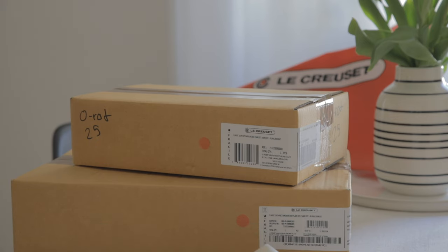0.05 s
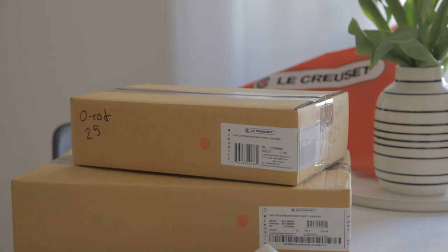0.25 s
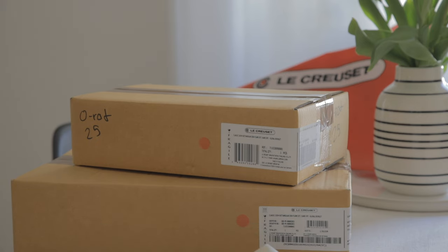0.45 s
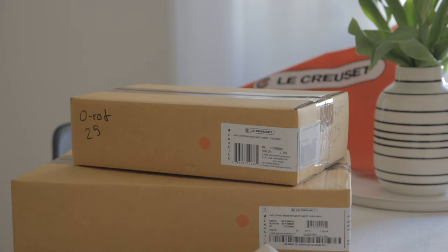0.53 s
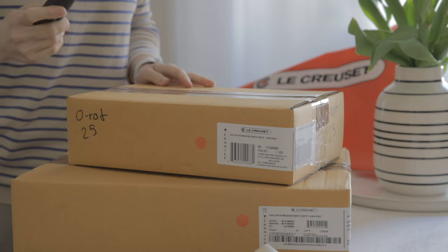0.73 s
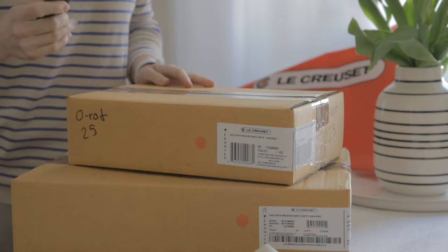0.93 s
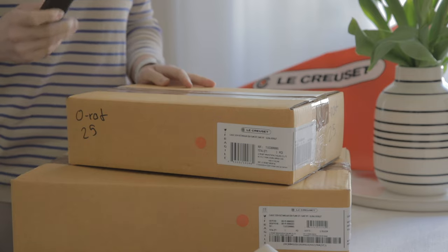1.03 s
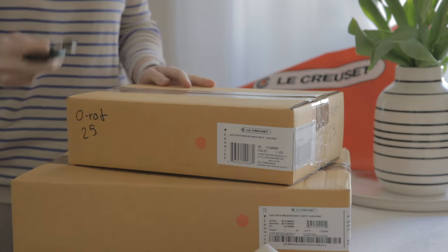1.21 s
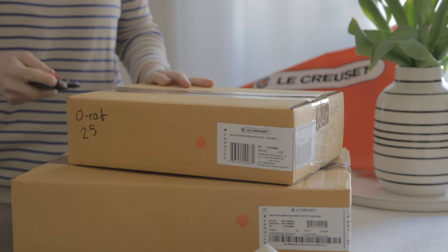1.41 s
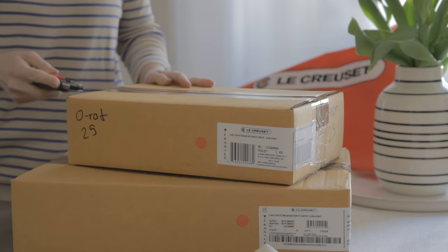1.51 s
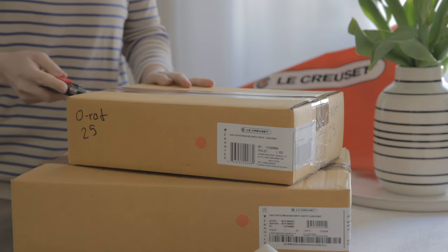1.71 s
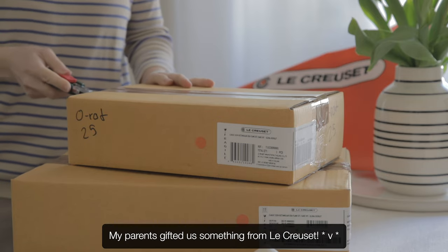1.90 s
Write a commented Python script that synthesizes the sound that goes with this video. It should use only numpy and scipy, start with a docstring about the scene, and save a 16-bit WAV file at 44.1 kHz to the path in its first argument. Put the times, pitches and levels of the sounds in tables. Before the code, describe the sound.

A utility knife blade slides out with six quick, sharp clicks, just after a few dull footsteps. Sleeves then rustle faintly and a hand brushes a cardboard box, in a slightly echoing room with a low rumble.

```python
"""A shoe rubs faintly and someone steps up to a table with dull thumps (0.2-0.6 s). The blade of a
utility knife is pushed out: six sharp ratchet clicks (0.6-0.9 s), on the whole louder and ringing
lower as more blade stands free. Sleeves rustle (1.3 s), then a hand brushes a cardboard box (1.7 s).
The room is fairly live, with a low steady rumble throughout."""
import sys
import numpy as np
from scipy import signal
from scipy.fft import rfft, irfft, next_fast_len
from scipy.io import wavfile
from scipy.ndimage import map_coordinates

SR = 44100
rng = np.random.default_rng(int(sys.argv[2]) if len(sys.argv) > 2 else 0)


def generate_wav(sig):
    """Save sig (samples, or channels by samples) to the path in sys.argv[1] as 16-bit PCM at SR."""
    pcm = np.round(np.clip(np.atleast_2d(sig).T, -1, 1) * 32767).astype(np.int16)
    wavfile.write(sys.argv[1], SR, pcm)


N = 85995

# diffuse field, left against right: freq_hz, correlation
ROOM_CORRELATION = [(100, 0.96), (300, 0.95), (700, 0.58), (1300, 0.51), (2500, 0.055), (6000, -0.042),
                    (14000, -0.12)]


def knife():
    """At each notch the slider rattles, the case buzzes, blade and track ring, the room echoes."""
    # notches: start_s, snap_db, blade_db, track_db, room_db, blade_pitch_ratio, tilt_db_per_octave,
    # track_resonance_db
    clicks = [(0.5841, -30, -58, -67, -25.5, 1.2, 0, -3.5),
              (0.6544, -28.5, -48, -58, -25.5, 1.14, -1, -0.5),
              (.7172, -28.5, -46.5, -46, -24, 1.13, -1.5, -3),
              (.7640, -26, -46, -40.5, -21, 0.95, -0.5, 7.5),
              (0.8355, -24, -47, -39.5, -18.5, 1.02, -.5, 5), (0.9192, -20, -40.5, -43, -16.5, 1.0, 1, 5.5)]
    # case response: freq_hz, gain_db
    case_spectrum = [(300, -26), (900, -20.5), (1450, -13), (1900, -6), (2350, -9), (2720, -1), (3250, -7),
                     (4400, -2), (5000, -1.5), (6300, -1), (7300, 1), (8700, -5), (10500, -3), (11400, -2),
                     (13000, -4.5), (15500, -3)]
    # blade, fully out: freq_hz, level_db, t60_s
    blade_modes = [(1864, -2, .38), (1931, -3, .34), (2026, -6, .25), (2640, -8, .15), (2830, -10, .15)]
    # steel track: freq_hz, level_db, t60_s
    track_modes = [(4440, -7, .3), (5404, -4, .3), (5545, -2, .3), (5675, -4, .3), (5853, -6, .25),
                   (6192, -7, .25), (6558, -7, .2), (7283, -8, .2)]
    # early echoes: delay_s, gain_db
    echoes = [(.0056, -1.5), (0.0118, -6.5)]
    rattle_s, buzz_db, buzz_t60_s = 0.0024, -13.5, 0.054
    blade_peak_hz, blade_width_hz, blade_peak_db = 1930, 170, 7.5  # blade in its holder
    track_peak_hz, track_width_hz = 5680, 340
    scatter_db, scatter_step_hz = 1.8, 330  # no two notches alike
    out, t = np.zeros((2, N)), np.arange(SR) / SR
    hz = freqs(t)
    contact = np.exp(-(t / rattle_s) ** 2) + amp(buzz_db - 60 * t / buzz_t60_s)
    impulse = np.linalg.norm(contact) * (t == 0)
    for start_s, snap_db, blade_db, track_db, room_db, pitch_ratio, tilt, resonance_db in clicks:
        colour_db = along(case_spectrum, hz) + tilt * np.log2((hz + 500) / 6000)
        colour_db += blade_peak_db * np.exp(-((hz - blade_peak_hz * pitch_ratio) / blade_width_hz) ** 2)
        colour_db += resonance_db * np.exp(-((hz - track_peak_hz) / track_width_hz) ** 2)
        colour_db += scatter_db * smooth_noise(hz / scatter_step_hz, knots=128)
        snaps = [coloured(burst(contact), colour_db) for _ in range(2)]
        steel = [amp(blade_db) * ring(blade_modes, t, pitch_ratio) + amp(track_db) * ring(track_modes, t)
                 for _ in range(2)]
        add(out, start_s, amp(snap_db) * spread(*snaps, side_db=-5.5) + spread(*steel, side_db=-2))
        add(out, start_s, amp(room_db) * reverb(coloured(impulse, colour_db)))
        for delay_s, gain_db in echoes:
            echo = np.array([coloured(burst(contact), colour_db) for _ in range(2)])
            add(out, start_s + delay_s, amp(snap_db + gain_db) * echo)
    return out


def steps():
    """Footfalls: a soft push and a woody knock set floor and room ringing."""
    # footfalls and after-knocks: start_s, thud_db, knock_db, mode_db
    thumps = [(.2020, -29.5, -48, -39), (.2180, -30.5, -54, -46), (.2570, -41, -54, -80),
              (0.288, -36.5, -64, -55), (.3190, -28, -22.5, -38), (0.3299, -33, -24, -37),
              (.3470, -29, -27.5, -40.5), (.3665, -35.5, -37, -41.5), (.4545, -35, -32, -42),
              (0.464, -35.5, -31.5, -51), (.4800, -36, -37, -39), (.5000, -41.5, -33.5, -47),
              (.5460, -45.5, -39.5, -46), (.5770, -50, -49, -48)]
    # soft push: freq_hz, gain_db
    thud_spectrum = [(30, -46), (60, -20), (130, -2.5), (200, -5), (320, -4), (460, -7.5), (800, -19.5),
                     (1500, -30), (4000, -50), (16000, -73)]
    # woody knock: freq_hz, gain_db
    knock_spectrum = [(60, -30), (250, -10.5), (540, -5), (700, 2), (1100, -0.5), (1270, -5), (1450, -16),
                      (2200, -21), (3200, -46), (6000, -45), (16000, -53)]
    # room resonances: freq_hz, level_db, t60_s
    room_modes = [(181, -7, .6), (319, -6, .6), (393, -10, .5), (468, -10, .5), (639, -7, .45),
                  (692, -7, .5), (906, -9, .5), (1023, -7, .45), (1083, -10, .45)]
    # floor booms: start_s, pitch_hz, level_db, t60_s
    booms = [(0.2, 133.5, -22, 0.12), (0.327, 94.8, -32.5, 0.46), (.452, 95.96, -34, 0.47),
             (.577, 94, -43, 0.5)]
    swell_s, contact_rise_s, knock_t60_s = 0.021, 0.0012, 0.04
    thud_room_db, knock_room_db = 2, -1.5
    out, t = np.zeros((2, N)), np.arange(SR) / SR
    swell = 1 - np.exp(-t / swell_s)
    contact = (1 - np.exp(-t / contact_rise_s)) * amp(-60 * t / knock_t60_s)
    impulse = np.linalg.norm(contact) * (t == 0)
    wood_db = along(knock_spectrum, freqs(t))
    push = coloured(impulse, along(thud_spectrum, freqs(t)))
    rap = coloured(impulse, wood_db)
    for start_s, thud_db, knock_db, mode_db in thumps:
        thud = amp(thud_db) * (push + amp(thud_room_db) * reverb(push))
        knock = amp(knock_db) * (coloured(burst(contact), wood_db) + amp(knock_room_db) * reverb(rap))
        add(out, start_s, thud + knock + amp(mode_db) * ring(room_modes, t) * swell)
    for start_s, pitch_hz, level_db, t60_s in booms:
        add(out, start_s, amp(level_db - 60 * t / t60_s) * swell * np.sin(2 * np.pi * pitch_hz * t))
    return out


def brushes():
    """Shoe or hand rubs lightly: a faint hollow squeak over a dry scuff."""
    # rubs: start_s, rise_s, t60_s, squeak_hz, width_hz, squeak_db, scuff_db
    rubs = [(0, 0.012, 1, 388, 39.2, -58.5, -65.5), (.090, 0.0042, 0.3, 1166, 72, -51.5, -82),
            (.105, 0.012, 0.1, 787, 30, -53, -80), (0.144, 0.0069, 0.098, 1124, 75.6, -57.5, -80),
            (1.735, 0.0063, 0.23, 920, 220, -56.5, -58), (1.762, 0.0077, 0.65, 950, 110, -60, -60),
            (1.859, 0.0089, 0.53, 1000, 203, -65, -62.5)]
    # dry friction: freq_hz, gain_db
    scuff_spectrum = [(150, -12), (700, -5.5), (1500, -5.5), (3200, -9.5), (4500, -17.5), (15000, -31)]
    out, t = np.zeros((2, N)), np.arange(N) / SR
    for start_s, rise_s, t60_s, squeak_hz, width_hz, squeak_db, scuff_db in rubs:
        resonance = 1 / (1 + (2 * (freqs(t) - squeak_hz) / width_hz) ** 2)
        squeak = unit(irfft(rfft(stereo_noise(ROOM_CORRELATION, N)) * resonance, N))
        scuff = hiss(scuff_spectrum, ROOM_CORRELATION)
        envelope = np.minimum(t / rise_s, 1) * amp(-60 * np.maximum(t - rise_s, 0) / t60_s)
        add(out, start_s, envelope * (amp(squeak_db) * squeak + amp(scuff_db) * scuff))
    return out


def sleeves():
    """Cloth rustles as body and arm move."""
    # rustle envelope: time_s, level_db
    rustle = [(0, -65), (.19, -67), (.23, -54.5), (.3, -64.5), (.35, -53), (.4, -56), (.45, -61.5),
              (.56, -63), (1.241, -64), (1.34, -57), (1.42, -61), (1.54, -66), (1.95, -65.5)]
    # cloth friction: freq_hz, gain_db
    cloth_spectrum = [(150, -15), (600, 2), (950, -1), (1350, 1), (2000, -2.5), (2600, -2.5), (3200, -2),
                      (3900, -7.5), (5000, -6.5), (9000, -13), (15000, -14.5)]
    level_db = np.interp(np.arange(N) / SR, *np.transpose(rustle))
    return amp(level_db) * hiss(cloth_spectrum, ROOM_CORRELATION)


def reverb(x):
    """Diffuse stereo room tail of about unit energy; treble dies first."""
    # room decay: freq_hz, t60_s
    decay_times = [(100, 1), (400, 0.5), (1000, 0.47), (2000, 0.82), (5000, .52), (8000, 0.44),
                   (15000, 0.28)]
    rise_s = 0.0013
    hz, t, noise = signal.stft(stereo_noise(ROOM_CORRELATION, SR), SR, nperseg=256)
    t60_s = along(decay_times, hz)[:, None]
    envelope = amp(-60 * t / t60_s) * (1 - np.exp(-t / rise_s))
    tail = signal.istft(noise * envelope, SR, nperseg=256)[1]
    return signal.fftconvolve(x[None], tail / np.linalg.norm(tail[0]), axes=1)[:, :SR]


def room_tone():
    """Low rumble with a little hiss, wavering slightly."""
    # rumble and hiss: freq_hz, gain_db
    air_spectrum = [(30, -38), (50, -7.5), (90, -15.5), (140, 0), (205, 0.5), (300, -8), (400, -5),
                    (500, -13), (900, -12), (1300, -18.5), (1900, -21.5), (4000, -29.5), (7000, -33.5),
                    (15500, -40.5)]
    # room tone, left against right: freq_hz, correlation
    air_correlation = [(60, 0.78), (180, 0.95), (550, 0.76), (1650, 0.46), (4970, -0.68), (15000, -0.057)]
    level_db, waver_db, knots_per_s = -60.5, 0.5, 10
    waver = smooth_noise(np.arange(N) * knots_per_s / SR, knots=24)
    return amp(level_db + waver_db * waver) * hiss(air_spectrum, air_correlation)


def amp(db):
    return 10 ** (np.asarray(db) / 20)


def unit(x):
    return x / np.sqrt(np.mean(x ** 2) + 1e-20)


def along(points, hz):
    """Interpolate (freq_hz, value) points on a log axis."""
    knots_hz, values = np.transpose(points)
    return np.interp(np.log(hz + 1), np.log(knots_hz + 1), values)


def freqs(x):
    return np.fft.rfftfreq(x.shape[-1], 1 / SR)


def add(out, start_s, x):
    i = max(0, round(start_s * SR))
    out[:, i:i + x.shape[-1]] += x[..., :N - i]


def spread(mid, side, side_db):
    return mid + amp(side_db) * np.array([side, -side])


def smooth_noise(position, knots):
    return map_coordinates(rng.standard_normal(knots), [position])


def coloured(x, gain_db):
    """Minimum-phase filter, scaled to mean power 1."""
    n = x.shape[-1]
    cepstrum = irfft(np.log(unit(amp(gain_db)) + 1e-6), n)
    cepstrum[1:n // 2] *= 2
    cepstrum[n // 2 + 1:] = 0
    return irfft(rfft(x) * np.exp(rfft(cepstrum)), n)


def stereo_noise(correlation, size):
    """White noise with left-right correlation set by frequency."""
    white = rng.standard_normal((2, size))
    angle = np.arccos(np.clip(along(correlation, freqs(white)), -1, 1)) / 2
    mid, side = irfft(rfft(white) * [np.cos(angle), np.sin(angle)], size)
    return spread(mid, side, side_db=0)


def hiss(spectrum, correlation):
    """Steady shaped stereo noise, rms 1."""
    white = stereo_noise(correlation, N)
    return unit(irfft(rfft(white) * amp(along(spectrum, freqs(white))), N))


def ring(modes, t, pitch_ratio=1):
    """Damped modes; level and phase vary per strike."""
    return sum(amp(db + rng.normal(0, 1) - 60 * t / t60_s)
               * np.sin(2 * np.pi * (hz * pitch_ratio * t + rng.random())) for hz, db, t60_s in modes)


def burst(envelope):
    """Dense contact chatter with a near-flat spectrum."""
    spectrum = rfft(envelope * rng.standard_normal(len(envelope)))
    whitened = irfft(spectrum / (abs(spectrum) + 1e-9), len(envelope))
    return envelope * np.sign(whitened)


def scene():
    return knife() + steps() + brushes() + sleeves() + room_tone()


def record(dry):
    """Brick-wall low-pass."""
    cutoff_hz = 15750
    padded = np.pad(dry, ((0, 0), (0, next_fast_len(N + SR // 2) - N)))
    return irfft(rfft(padded) * (freqs(padded) < cutoff_hz), padded.shape[-1])[:, :N]


dry = scene()
out = record(dry)
generate_wav(out)
```